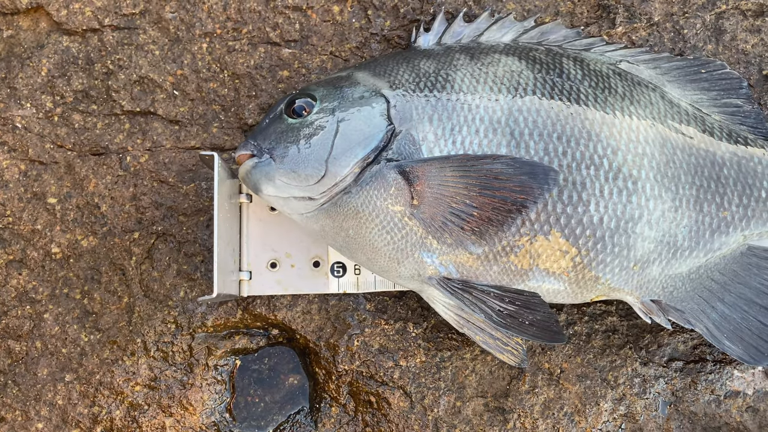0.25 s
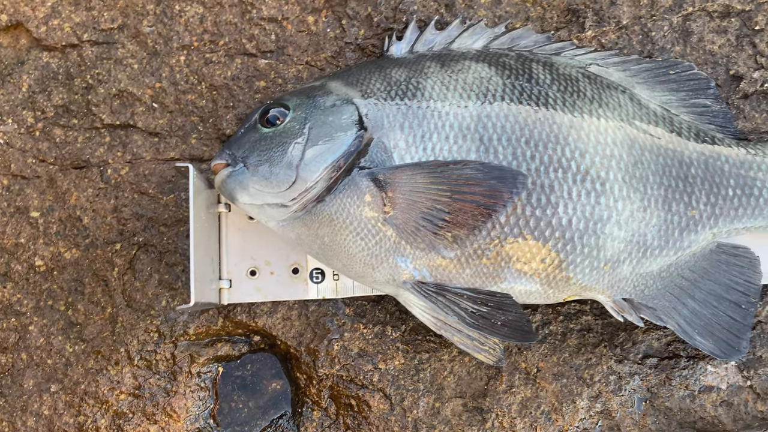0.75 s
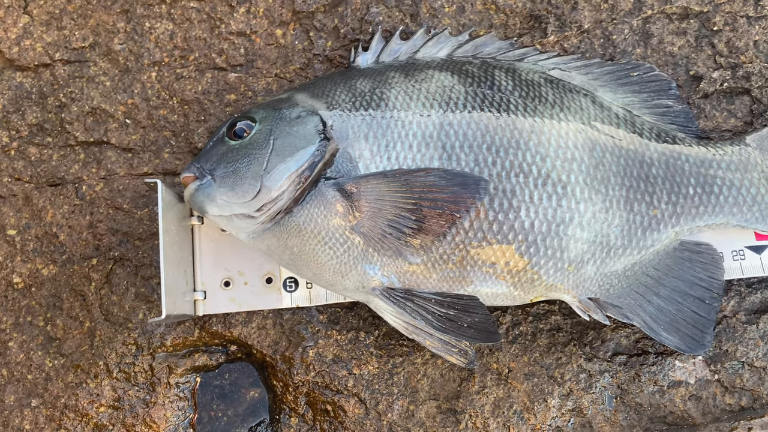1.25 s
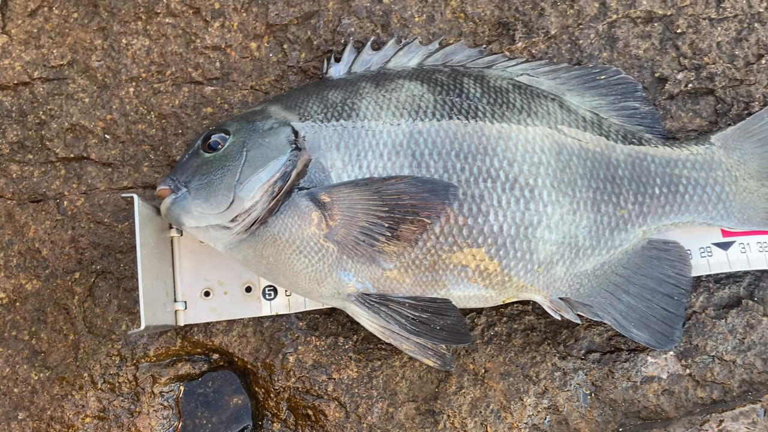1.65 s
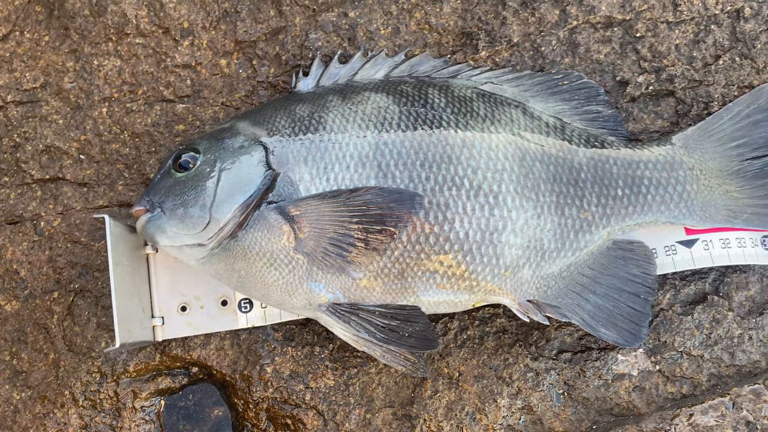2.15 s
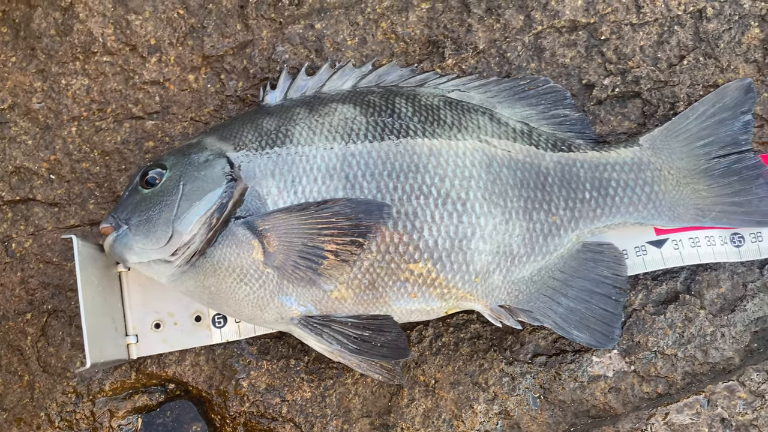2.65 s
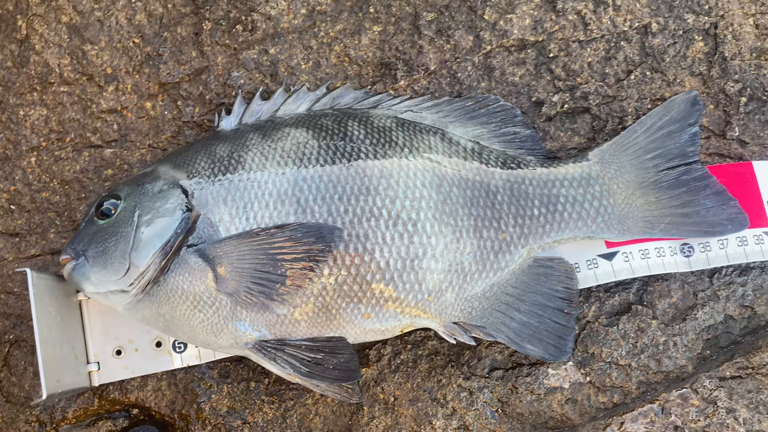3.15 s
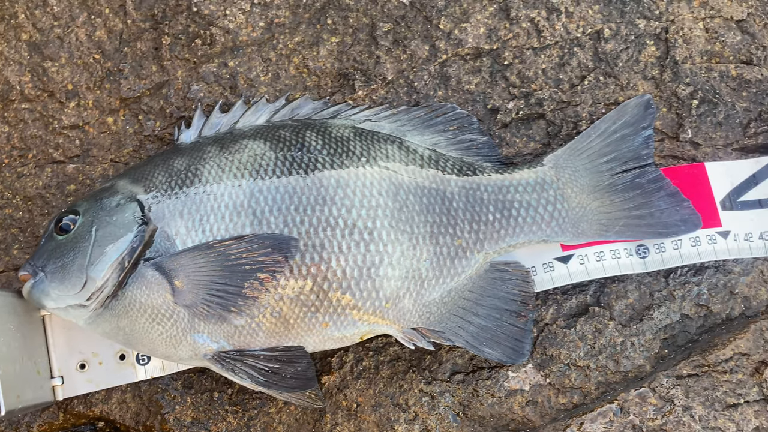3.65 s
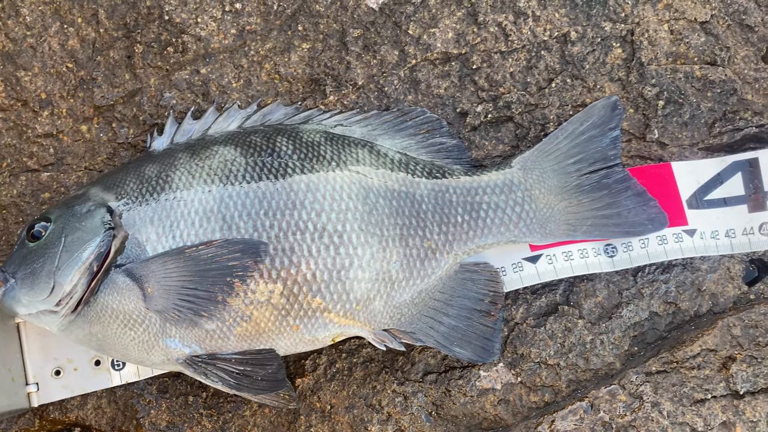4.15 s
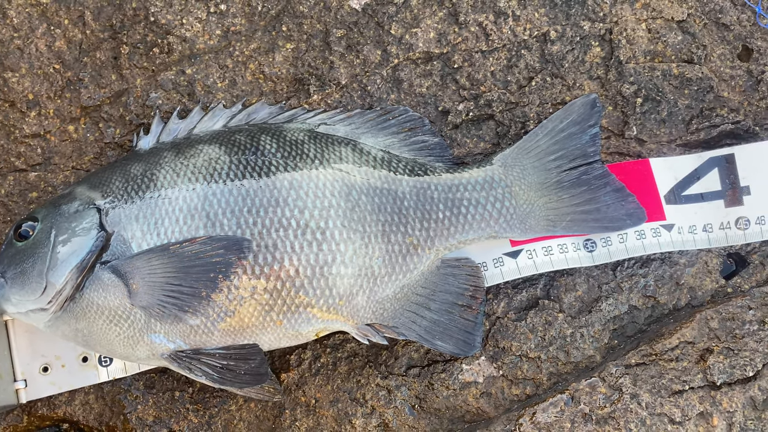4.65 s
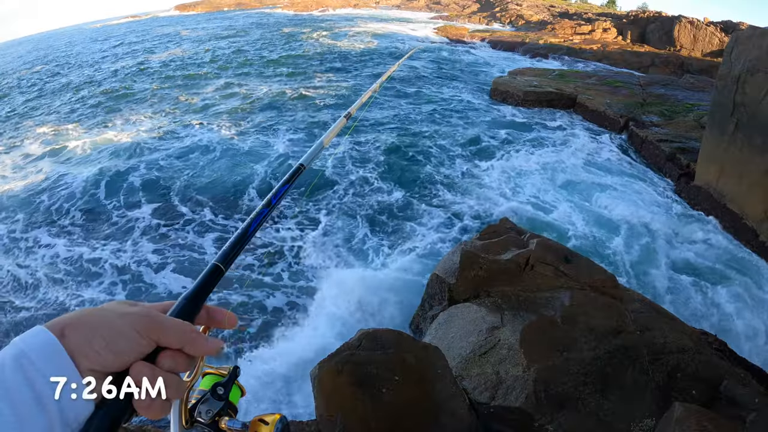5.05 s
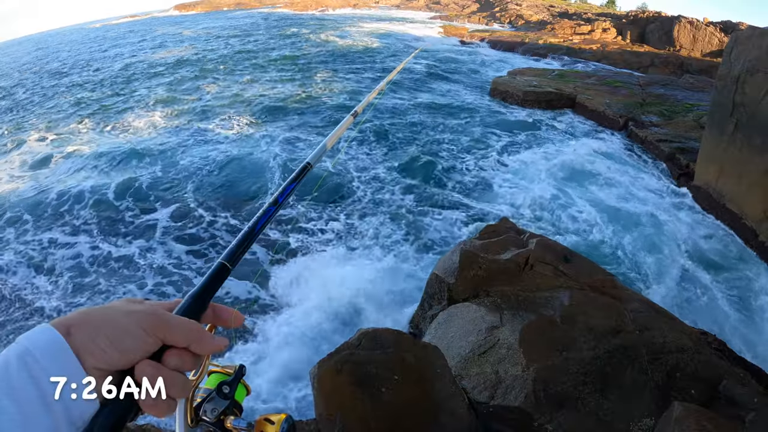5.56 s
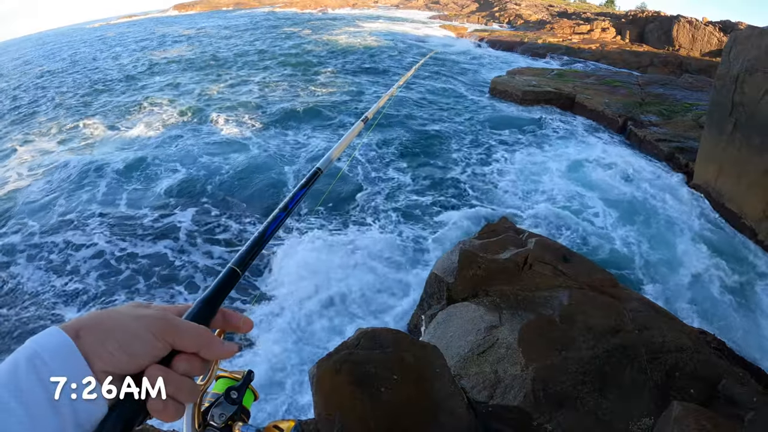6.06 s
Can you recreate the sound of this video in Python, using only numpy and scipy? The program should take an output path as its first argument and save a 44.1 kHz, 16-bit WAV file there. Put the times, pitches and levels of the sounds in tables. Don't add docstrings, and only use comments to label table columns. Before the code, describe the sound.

From 0 to about 4.75 seconds, surf is heard from a sheltered spot among rocks through a hand-held stereo microphone: deep boom and dull wash from hidden breakers, weak foam hiss, small ringing bubbles of draining water, and uneven wind lumps in the bass. Low, soft thumps of waves slapping hollows recur irregularly, stronger around 3 and 3.9 seconds. At roughly 1.0 to 1.3 seconds a distant shore bird gives four quick, faint high whistles, the second loudest and falling. The swell lulls near 1.7, breaks around 3.1 and rises to its biggest at 4.75. A tiny silent gap follows near 4.79, then the sound abruptly becomes much louder and brighter: white water churning straight ahead of a chest-worn camera. It eases around 5.3, swells again at 5.6, then settles, with low slaps at 5.15, 5.5, 5.9 and a heavy double one near 6.15.

```python
import sys
import numpy as np
from scipy import signal
from scipy.fft import rfft, irfft, next_fast_len
from scipy.io import wavfile
from scipy.ndimage import uniform_filter1d

SR = 44100
rng = np.random.default_rng(int(sys.argv[2]) if len(sys.argv) > 2 else 0)


def transcribe(u):
    v = np.clip(np.atleast_2d(u).T, -1, 1)
    q = np.round(v * 32767).astype(np.int16)
    wavfile.write(sys.argv[1], SR, q)


def volts_from_db(level):
    exponent = np.asarray(level, float) / 20
    return 10 ** exponent


N = 277830

LAYER_CENTRES_HZ = [80, 350, 1300, 5500]
# frequency in Hz, left level in dB per Hz, right level in dB per Hz,
# likeness of the ports 0-1, lead of the right in radians.
LEE_PORTS = [(59.7, -48.5, -50, 0.98, 0.16), (121.3, -50, -53, 1, 0.12), (212, -56, -61.5, 0.31, 0.93),
             (463, -64.5, -60, 0.92, 1.8), (965, -72, -70.5, 0.64, 3.63), (1520, -80.5, -76, 0.66, 2.8),
             (2370, -84, -82, 0.68, 5.2), (4020, -84, -90.5, 1, 5.13), (5200, -86.5, -99.5, 0.05, 4.9),
             (6240, -87.5, -99, 0.2, 6.2), (8600, -94, -93.5, 0.88, 9.9),
             (11000, -98.5, -98.5, .995, 12.57), (13700, -107, -107, .995, 15.7),
             (15100, -110, -110, .99, 18.9), (15700, -114, -114, .99, 20.2)]
EDGE_PORTS = [(242, -49, -49, 1, 0.019), (520, -52.5, -53.5, 1, 0.22), (890, -58, -56.5, 0.8, 0.36),
              (1100, -55.5, -55.5, 0.98, 0.086), (1710, -61.5, -60.5, 0.58, 0.26),
              (2570, -68.5, -66.5, 0.53, 0.28), (3600, -68.5, -66, 0.81, 0.0013),
              (4670, -67.5, -67.5, 0.97, 0.18), (6200, -72, -72, 0.89, 0.44), (7270, -73.5, -74, 0.86, 0),
              (8530, -80.5, -80.5, 0.92, 0), (11000, -86, -88, 0.85, 0), (12400, -85.5, -85, 0.41, 0),
              (15200, -112, -111, .6, 0)]
# centre in Hz, width in Hz, left gain in dB, right gain in dB.
LEE_CASING = [(238, 35, -13, 5.5), (503, 39, 5.5, -7), (742, 102, 3, 4), (1244, 184, 4, 4),
              (1460, 370, 3.5, 0), (3600, 650, -0.5, 2.5), (4500, 660, -1, -4), (5120, 300, 2, 11),
              (5040, 170, -2, -1.5), (6900, 770, -2, -5)]
EDGE_CASING = [(337, 27, 1.5, 3), (1420, 170, 1.9, 0.7), (1980, 300, -0.75, -0.83), (7600, 630, 1.5, 1)]
# left delay in seconds, right delay in seconds, level in dB.
LEE_ECHOES = [(.0047, 0.0075, -30.5), (.0083, 0.0064, -19), (0.0124, 0.011, -21)]
EDGE_ECHOES = [(.0031, .0031, -37), (.0073, .0073, -32), (.0119, .0119, -24)]
# start in seconds, peak in dB, pitch in Hz.
LEE_THUMPS = [(0.005, -22, 100.4), (0.441, -27, 75), (0.748, -26, 66.7), (1.081, -19, 98),
              (1.179, -22, 138), (1.545, -17, 82), (1.866, -31, 128.6), (1.99, -24, 80.6),
              (2.513, -17, 77.6), (2.747, -17.5, 64.3), (2.798, -17, 90.6), (3.038, -14, 80),
              (3.53, -25, 109.3), (3.609, -22.5, 84.4), (3.913, -13, 108.4), (4.018, -19, 61.9),
              (4.267, -27, 106.6), (4.496, -23, 60.4)]
EDGE_THUMPS = [
    (5.149, -22, 95),
    (5.455, -19, 95),
    (5.555, -21, 78),
    (5.908, -20, 85),
    (6.143, -17.5, 85),
    (6.165, -16, 75),
]
# time in seconds, level in dB.
LEE_SWELL = [
    (0, -34),
    (.8, -35),
    (1.2, -34),
    (1.7, -38),
    (2.3, -34),
    (3.1, -31),
    (3.7, -34),
    (4.15, -32),
    (4.75, -29),
]
# time in seconds, level in dB.
LEE_FOAM = [
    (0, -57),
    (.85, -59),
    (1.02, -57.5),
    (1.6, -56.5),
    (2.75, -60),
    (3.0, -58),
    (3.75, -56),
    (4.1, -63),
    (4.3, -56.5),
    (4.75, -54),
]
# time in seconds, level in dB.
EDGE_CHURN = [
    (4.8, -23),
    (5.28, -25),
    (5.45, -24),
    (5.6, -23),
    (5.85, -25),
    (6.3, -25.5),
]
SWELL_SHARE = [0.71, 0.55, 0.22, 0.01]
FOAM_SHARE = [0.01, 0.1, 0.599, 1.051]
CHURN_SHARE = [.1, .9, 1.05, 1.1]
# start in seconds, length in seconds, first pitch in Hz, last pitch in Hz, level in dB.
WHISTLES = [
    (.98, .085, 4300, 4410, -69),
    (1.07, .085, 4420, 4190, -65.5),
    (1.16, .085, 4190, 4230, -67),
    (1.245, .05, 4000, 3860, -70),
]

SWITCH_S = 4.788
LEE_LOW_CUT_HZ, EDGE_LOW_CUT_HZ = 55, 61
LEE_TOP_HZ, EDGE_TOP_HZ = 15700, 14800
ECHO_CUT_HZ = 7300
FADE_OUT_S, FADE_OUT_LENGTH_S, TRACE_GAIN, TRACE_END_S = 4.7525, .006, .014, 4.786
FADE_IN_S, FADE_IN_LENGTH_S = 4.7915, .017
ARCH_HZ_PER_S, WHISTLE_EDGE_S = 500, .015
NARROW_FROM_S, NARROW_TO_S, WIDE_KEEP, NARROW_KEEP = 5.35, 5.9, .6, -.9


def drift(size, rate_hz):
    r = np.exp(-80 * np.pi * rate_hz / SR)
    noise = rng.standard_normal(size // 40 + 2002)
    slow = signal.lfilter([1], [1, -2 * r, r * r], noise)[2000:]
    return np.interp(np.arange(size) / 40, np.arange(len(slow)), slow / slow.std())


def bursting(size, per_s, spread_db, share):
    sizes_db = spread_db * np.minimum(rng.exponential(1, (2, size)), 5)
    clicks = volts_from_db(sizes_db) * rng.choice([-1, 1], (2, size))
    clicks = clicks * (rng.random(size) < per_s / SR)
    share = np.clip(share, 0, 1)
    smooth = np.sqrt(1 - share) * rng.standard_normal((2, size))
    return smooth + np.sqrt(share) * clicks / clicks.std()


def layers(t, *controls):
    swings = [(np.interp(t, *np.transpose(curve)), share) for curve, share in controls]
    return sum(np.outer(share, db - db.mean()) for db, share in swings)


def swelling(white, start, controls, shared_db, own_db, gust_db):
    size = white.shape[1]
    change_db = layers((start + np.arange(size)) / SR, *controls)
    spectrum = rfft(white)
    octave = np.log2(np.arange(size // 2 + 1) * SR / size + 1)
    surge, gust, out = drift(size, 5.7), drift(size, 35.0), 0
    for centre in np.arange(4.5, 14.5, .5):
        window = np.cos(np.pi * np.clip(octave - centre, -.5, .5)) ** 2
        place = np.interp(centre, np.log2(LAYER_CENTRES_HZ), range(4))
        low = min(int(place), 2)
        db = change_db[low] + (place - low) * (change_db[low + 1] - change_db[low])
        db = db + shared_db * surge + own_db * drift(size, 4.9)
        db = db + gust_db * max(1 - place, 0) * gust
        out = out + volts_from_db(db) * irfft(spectrum * window, size)
    return out


def ports(pair, table, casing, echoes, low_cut_hz, top_hz, order):
    size = pair.shape[1]
    hz = np.arange(size // 2 + 1) * SR / size + 1e-3
    at_hz, *columns = np.transpose(table)
    left_db, right_db, alike, lead_rad = [np.interp(np.log(hz), np.log(at_hz), c) for c in columns]
    alike = np.clip(alike, 0, 1)
    low_cut = np.sqrt(1 + (low_cut_hz / hz) ** (2 * order))
    common, own = rfft(pair) * np.sqrt(SR / 2) * (hz < top_hz) / low_cut
    right = alike * np.exp(1j * lead_rad) * common + np.sqrt(1 - alike ** 2) * own
    humps_db = 0
    for centre_hz, width_hz, *db in casing:
        humps_db = humps_db + np.outer(db, np.exp(-2 * ((hz - centre_hz) / width_hz) ** 2))
    dull = 1 / (1 + (hz / ECHO_CUT_HZ) ** 2)
    reflected = sum(volts_from_db(db) * np.exp(-2j * np.pi * np.outer(lags_s, hz)) for *lags_s, db in echoes)
    ripple = 1 + dull * reflected
    return irfft(volts_from_db(humps_db) * ripple * [volts_from_db(left_db) * common, volts_from_db(right_db) * right], size)


def bird():
    out, t = np.zeros(N), np.arange(N) / SR
    for start_s, length_s, first_hz, last_hz, db in WHISTLES:
        part = np.clip((t - start_s) / length_s, 0, 1)
        hz = first_hz + (last_hz - first_hz) * part
        hz = hz + ARCH_HZ_PER_S * length_s * np.sin(np.pi * part)
        shape = np.clip(np.minimum(t - start_s, start_s + length_s - t) / WHISTLE_EDGE_S, 0, 1)
        out += volts_from_db(db) * shape * np.sqrt(2) * np.sin(2 * np.pi * np.cumsum(hz) / SR)
    return out * volts_from_db([[1.5], [3.5]])


def thumps():
    out, t = np.zeros(N), np.arange(int(.12 * SR)) / SR
    for start_s, db, hz in LEE_THUMPS + EDGE_THUMPS:
        i = int(start_s * SR)
        shape = t / 0.018 * np.exp(1 - t / 0.011) * np.sin(2 * np.pi * hz * t)
        out[i:i + len(t)] += volts_from_db(db - 1.0) * shape
    return out * volts_from_db([[.7], [-.7]])


def trickles(size, per_s, cycles, level_db):
    born = (rng.random(size) < per_s / SR) * volts_from_db(2.3 * np.minimum(rng.exponential(1, size), 3))
    dealt, out = rng.integers(0, 40, size), 0
    for k, hz in enumerate(np.geomspace(900, 7000, 40)):
        r, w = volts_from_db(-60 * hz / cycles / SR), 2 * np.pi * hz / SR
        carrier = np.exp(1j * w * np.arange(size))
        soft = signal.lfilter([1 - r], [1, -r], born * (dealt == k) * carrier + 1e-18)
        ring = signal.lfilter([1 - r], [1, -r * np.exp(1j * w)], np.abs(soft) * carrier).real
        out = out + ring * np.sqrt(hz) / (1 - r)
    return volts_from_db(level_db) * out / out.std()


def lee_surf(size):
    white = bursting(size, per_s=1500.0, spread_db=2.5, share=0.067)
    controls = [(LEE_SWELL, SWELL_SHARE), (LEE_FOAM, FOAM_SHARE)]
    sea = swelling(white, 0, controls, shared_db=-0.12, own_db=.5, gust_db=1.2)
    sea = sea + trickles(size, per_s=350.0, cycles=90.0, level_db=-17.0)
    return ports(sea, LEE_PORTS, LEE_CASING, LEE_ECHOES, LEE_LOW_CUT_HZ, LEE_TOP_HZ, order=4)


def narrowed(pair, start):
    size = pair.shape[1]
    mid, side = (pair[0] + pair[1]) / 2, (pair[0] - pair[1]) / 2
    hz, t = np.arange(size // 2 + 1) * SR / size, (start + np.arange(size)) / SR
    keep = np.where((t > NARROW_FROM_S) & (t < NARROW_TO_S), NARROW_KEEP, WIDE_KEEP)
    edges_hz = [4000, 4700, 5700, 6900, 7800, 9600, 11800, 13000, 16000]
    bias = [.6, -1.6, -.3, .4, -.7, -.2, 1.5, -.3]
    for low_hz, high_hz, lean in zip(edges_hz, edges_hz[1:], bias):
        dropped = uniform_filter1d(1. * (keep + lean + .7 * drift(size, 12.0) < 0), size=512)
        side = side - dropped * irfft(rfft(side) * (hz >= low_hz) * (hz < high_hz), size)
    return np.array([mid + side, mid - side])


def ragged_top(pair):
    size = pair.shape[1]
    hz, spectrum = np.arange(size // 2 + 1) * SR / size, rfft(pair)
    keep = drift(size, 10.0)
    for low_hz, high_hz, need in [(13400, 13800, -.8), (13800, 14300, .2), (14300, 16000, .9)]:
        dropped = uniform_filter1d(1. * (keep < need), size=512)
        pair = pair - dropped * irfft(spectrum * (hz >= low_hz) * (hz < high_hz), size)
    return pair


def edge_surf(start, size):
    white = bursting(size, per_s=2100.0, spread_db=-2.0, share=0.067)
    controls = [(EDGE_CHURN, CHURN_SHARE)]
    sea = swelling(white, start, controls, shared_db=0.37, own_db=0.39, gust_db=1.4)
    heard = ports(sea, EDGE_PORTS, EDGE_CASING, EDGE_ECHOES, EDGE_LOW_CUT_HZ, EDGE_TOP_HZ, order=2)
    return ragged_top(narrowed(heard, start))


def joint():
    t = np.arange(N) / SR
    trace = TRACE_GAIN * (TRACE_END_S - t) / (TRACE_END_S - FADE_OUT_S)
    out = np.maximum(1 - (t - FADE_OUT_S) / FADE_OUT_LENGTH_S, trace)
    return np.clip(np.maximum(out, (t - FADE_IN_S) / FADE_IN_LENGTH_S), 0, 1)


def scene():
    switch = int(SWITCH_S * SR)
    lee = lee_surf(next_fast_len(switch))[:, :switch]
    edge = edge_surf(switch, next_fast_len(N - switch))[:, :N - switch]
    return (np.hstack([lee, edge]) + bird() + thumps()) * joint()


def top_cut(x):
    return signal.sosfilt(signal.butter(12, 15660, fs=SR, output="sos"), x)


def record(dry):
    rounded = .6 * np.tanh(dry / .6)
    return top_cut(rounded)


dry = scene()
out = record(dry)
transcribe(out)
```